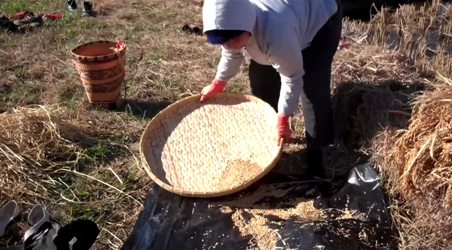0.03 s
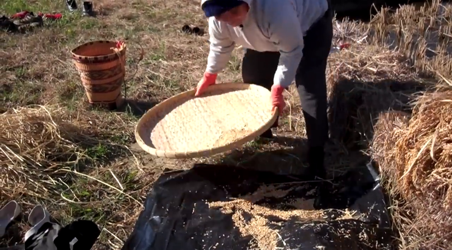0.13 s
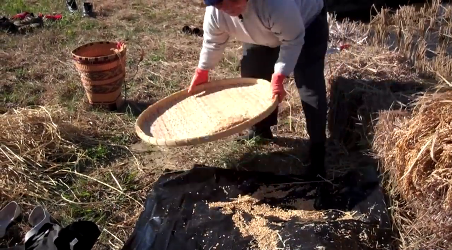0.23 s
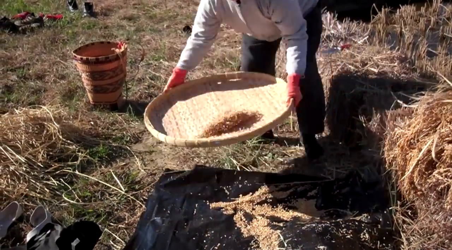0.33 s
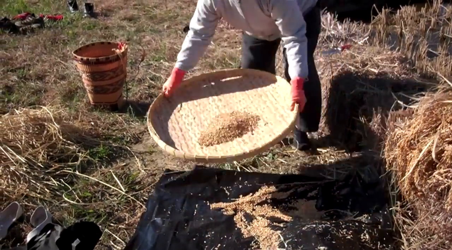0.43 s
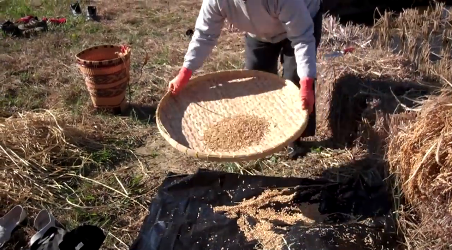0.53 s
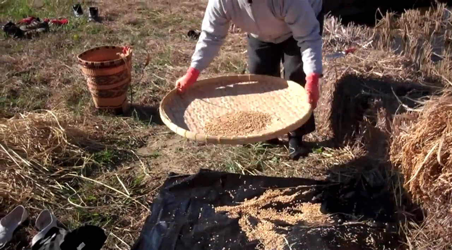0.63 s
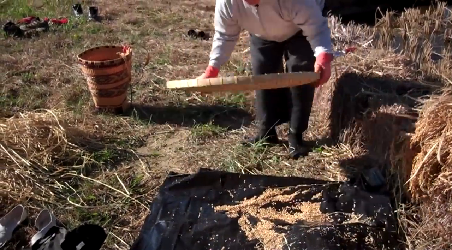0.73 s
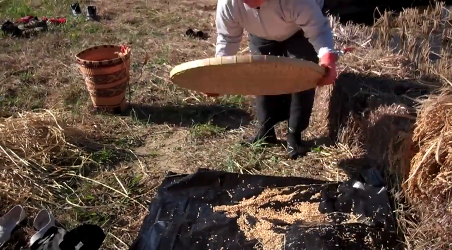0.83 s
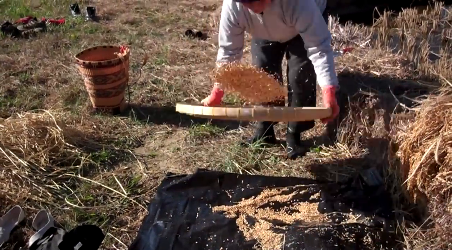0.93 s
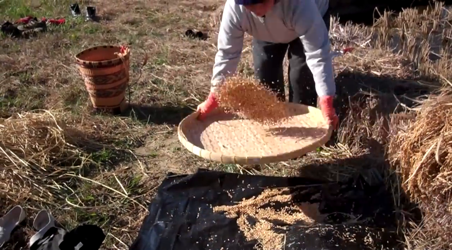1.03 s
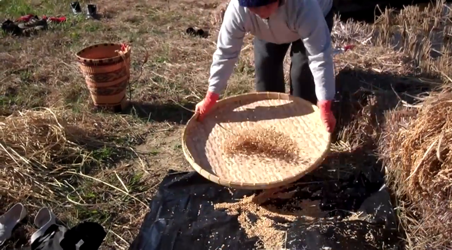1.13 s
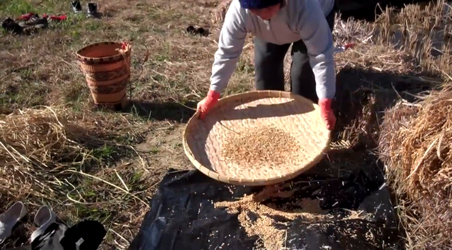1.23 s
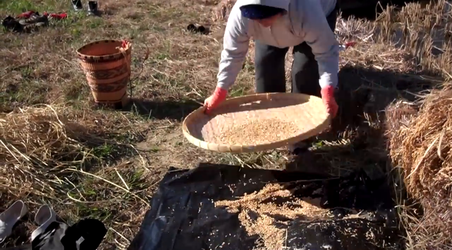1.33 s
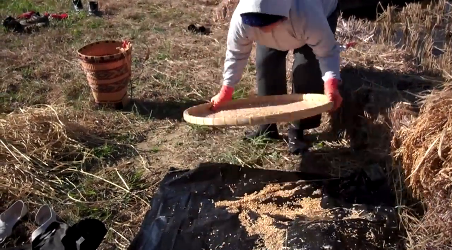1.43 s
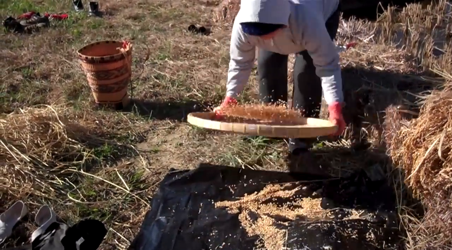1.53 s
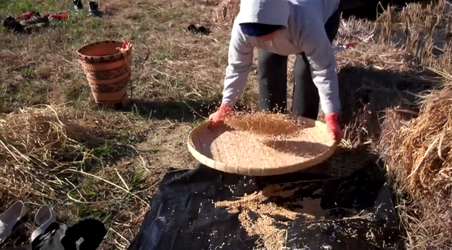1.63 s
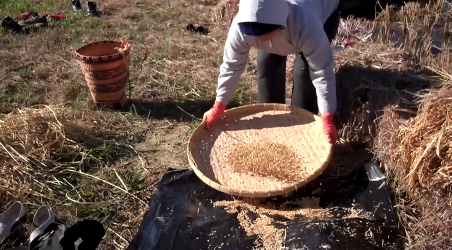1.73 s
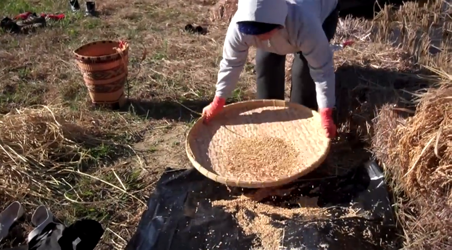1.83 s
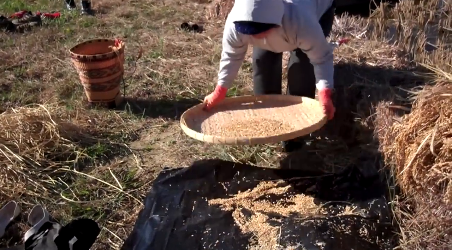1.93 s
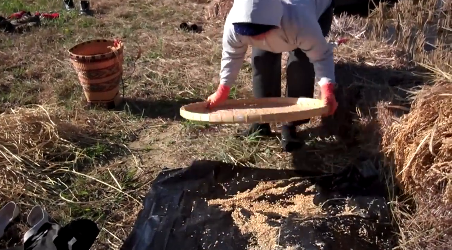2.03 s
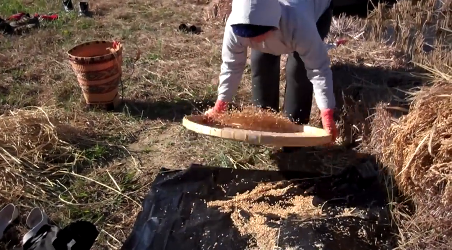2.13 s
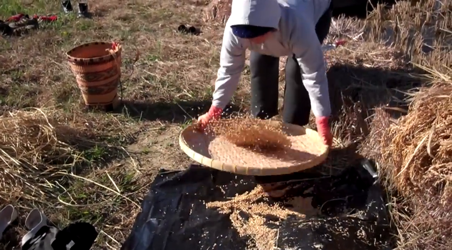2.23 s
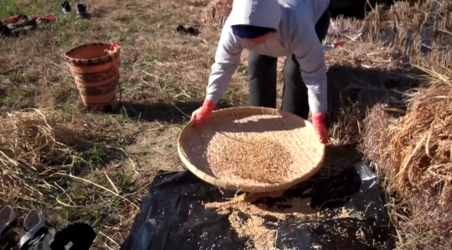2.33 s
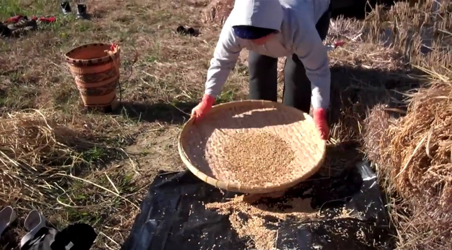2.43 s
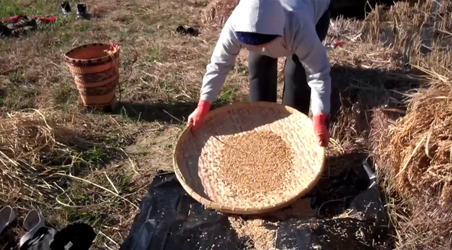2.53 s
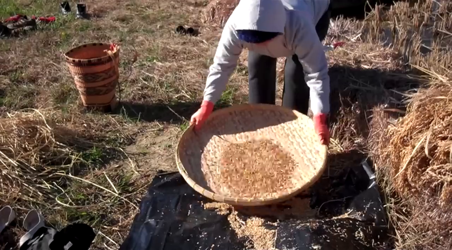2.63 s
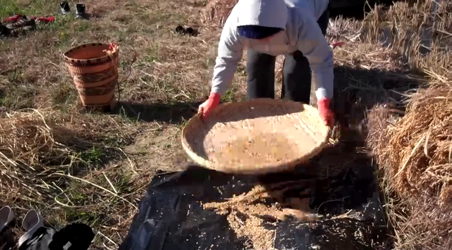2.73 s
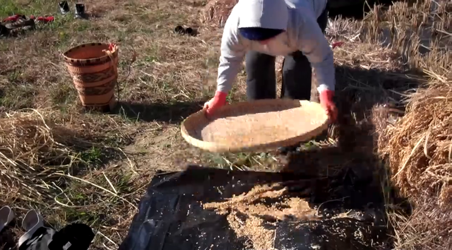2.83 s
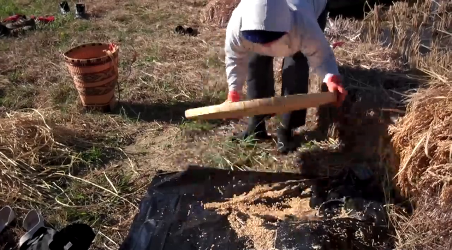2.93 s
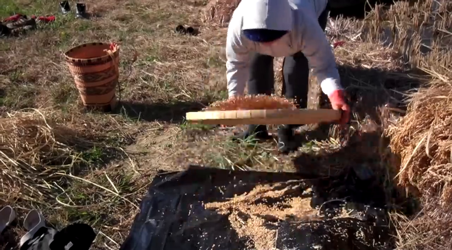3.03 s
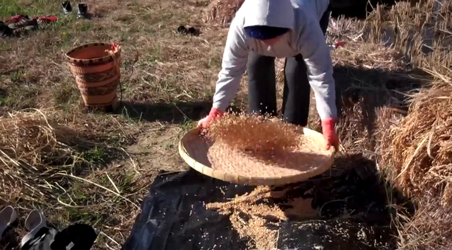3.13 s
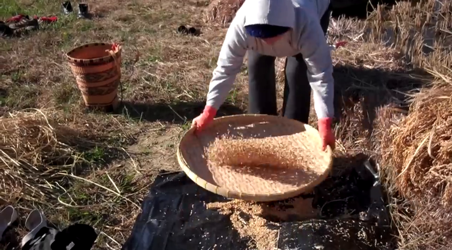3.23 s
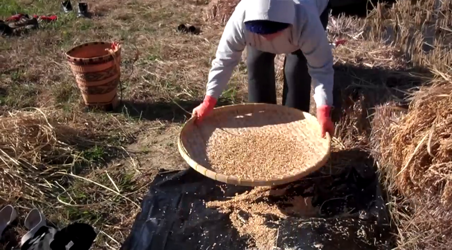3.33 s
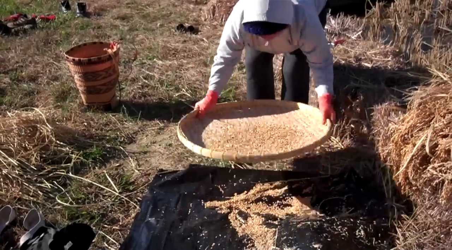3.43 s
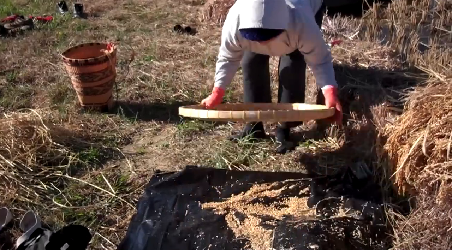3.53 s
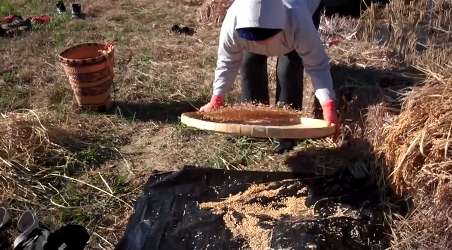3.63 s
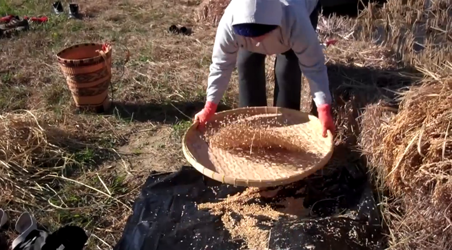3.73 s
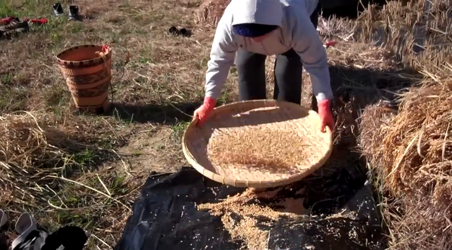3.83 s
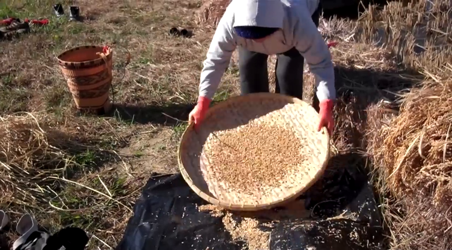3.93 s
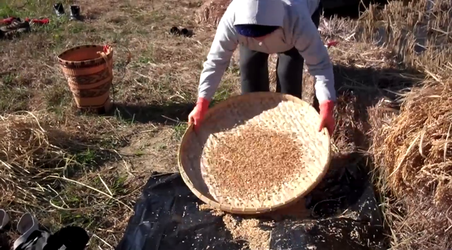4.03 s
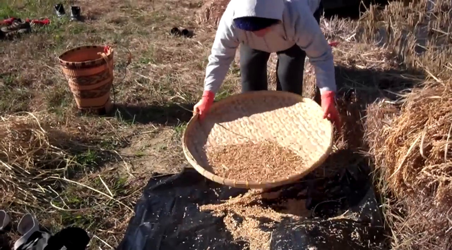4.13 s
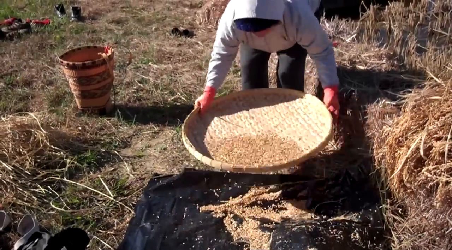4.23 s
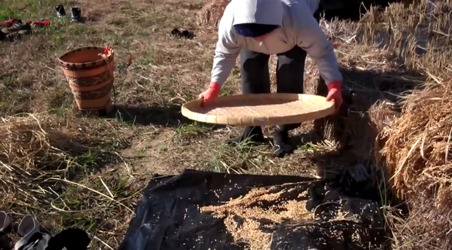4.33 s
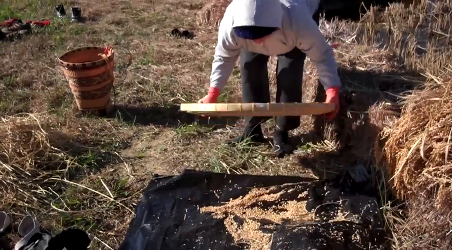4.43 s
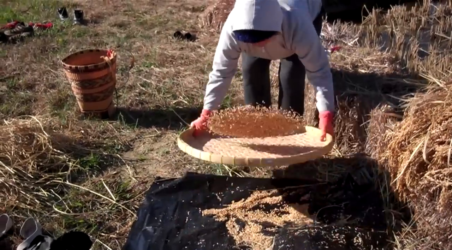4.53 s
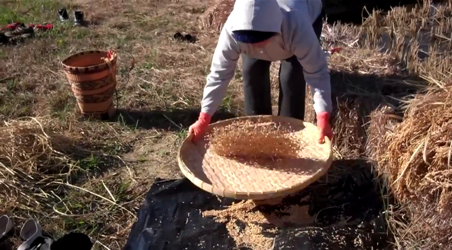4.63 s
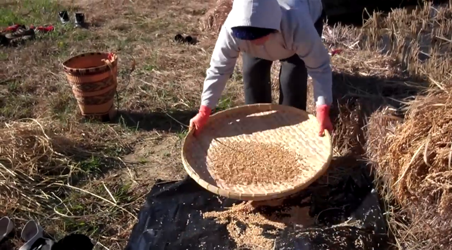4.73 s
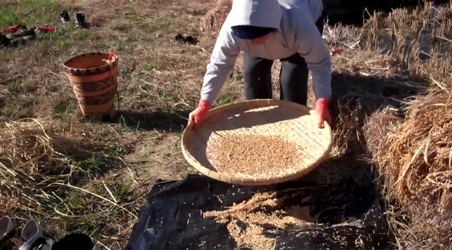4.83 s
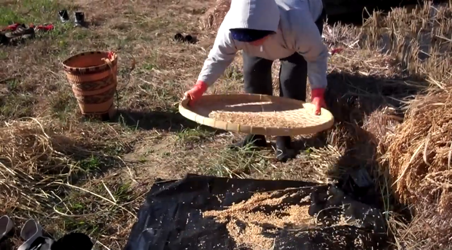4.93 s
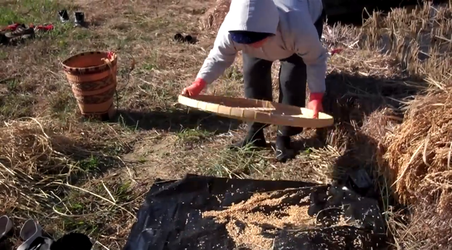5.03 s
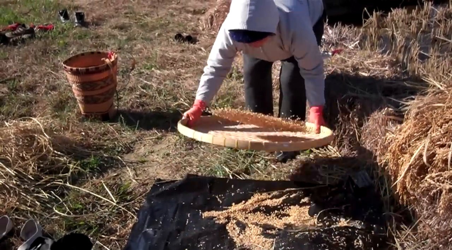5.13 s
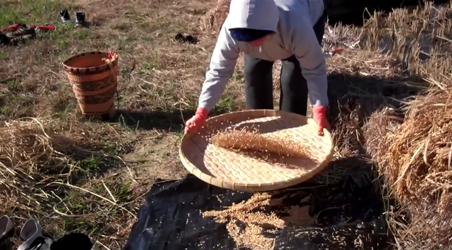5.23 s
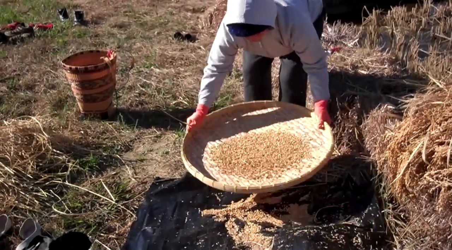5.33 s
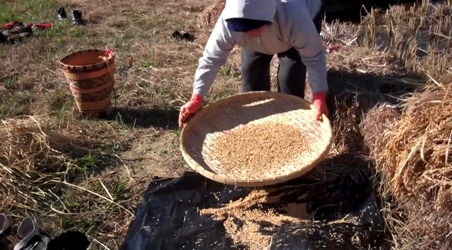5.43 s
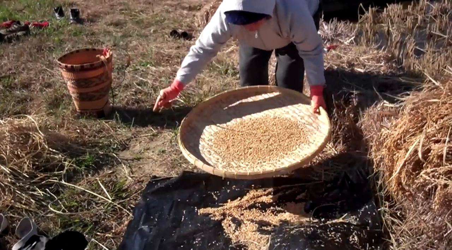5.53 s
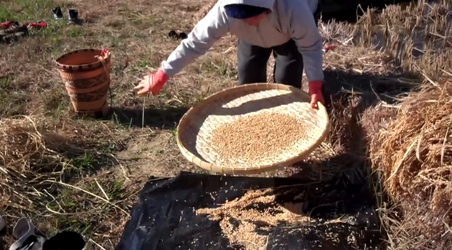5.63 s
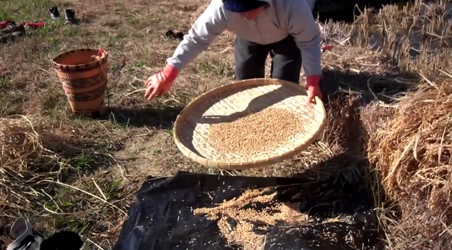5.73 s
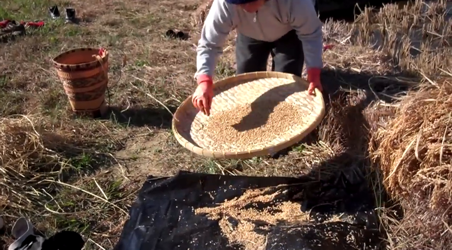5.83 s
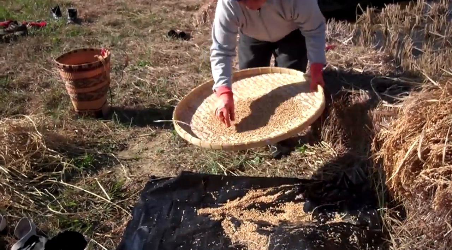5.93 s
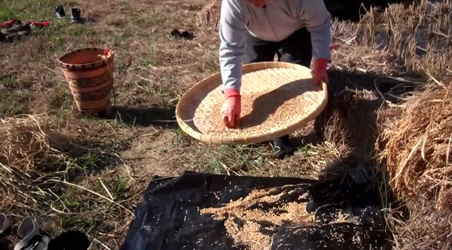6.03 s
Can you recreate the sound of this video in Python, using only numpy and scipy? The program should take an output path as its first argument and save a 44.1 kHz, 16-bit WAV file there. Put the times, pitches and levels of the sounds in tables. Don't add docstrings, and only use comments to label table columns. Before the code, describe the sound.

Rhythmic bright swishes of dry kernels catching on a shallow basket, short rolling tails, faint wind puffs and dry stalk crackle in a field.

```python
import sys
import numpy as np
from scipy import signal
from scipy.fft import rfft, irfft, next_fast_len
from scipy.io import wavfile
from scipy.ndimage import uniform_filter1d

SR = 44100
rng = np.random.default_rng(int(sys.argv[2]) if len(sys.argv) > 2 else 0)


def wav_out(sig):
    wavfile.write(sys.argv[1], SR, np.round(np.clip(np.atleast_2d(sig).T, -1, 1) * 32767).astype(np.int16))


def magnitude_from_level(level_db):
    exponent = np.asarray(level_db, float) / 20
    return 10 ** exponent


N = 268701

# frequency in Hz, level in dB per Hz.
KERNEL_SPECTRUM = [(250, -23.5), (430, -23), (560, -11), (1000, -3), (1500, -3), (2000, 1.5), (2600, 3),
                   (3200, 7), (4500, 6.5), (14000, -5)]


def evened(x):
    return x / np.sqrt(np.mean(x ** 2) + 1e-20)


def read(points, hz):
    f_hz, value = np.transpose(points)
    return np.interp(np.log(hz + 1), np.log(f_hz + 1), value)


def coloured(x, points):
    log_gain = np.log(magnitude_from_level(read(points, abs(np.fft.fftfreq(4096, 1 / SR)))))
    taps = np.fft.ifft(np.exp(np.conj(signal.hilbert(log_gain)))).real[:1024]
    return signal.oaconvolve(x, taps[None], axes=-1)[:, :N]


def filtered(x, order, hz, kind="low"):
    return signal.sosfilt(signal.butter(order, hz, kind, fs=SR, output="sos"), x)


def band(x, lo_hz, hi_hz):
    return filtered(x, 2, [lo_hz, hi_hz], "band")


def wander(hz):
    return evened(filtered(rng.standard_normal(N), 1, hz))


def clicks(per_s, spread_db):
    chance = np.clip(per_s / SR, 1e-4, 1)
    size = magnitude_from_level(spread_db * np.minimum(rng.exponential(1, N), 4))
    size = size * (rng.random(N) < chance) / np.sqrt(chance)
    return evened(size) * rng.choice([-1., 1.], (2, N))


def patchy(x, patchy_db):
    z = signal.stft(x, nperseg=512, noverlap=384)[2]
    patches = uniform_filter1d(rng.standard_normal(z.shape[1:]), size=5, axis=0)
    patches = uniform_filter1d(patches, size=10, axis=1)
    z = z * magnitude_from_level(patchy_db * evened(patches))
    return signal.istft(z, nperseg=512, noverlap=384)[1][:, :N]


def pair(x, same, lead):
    size = next_fast_len(N)
    hz = np.fft.rfftfreq(size, 1 / SR)
    share = read(same, hz)
    a, b = rfft(x, size)
    shared = share * a * np.exp(1j * read(lead, hz))
    right = irfft(shared + np.sqrt(1 - share ** 2) * b, size)[:N]
    return np.array([x[0], right])


def motion():
    # start in seconds, hold in seconds, peak in dB,
    # release in dB per second, first swell in seconds.
    shower_rows = [
        (1.14, 0.18, -14.5, 199, 0.012),
        (1.735, 0.19, -15.5, 277, 0.021),
        (2.3, 0.16, -14.5, 111, 0.016),
        (3.23, 0.18, -14.5, 505, 0.013),
        (3.78, 0.17, -14.5, 124, 0.024),
        (4.676, 0.17, -14.5, 428, 0.017),
        (5.251, 0.17, -15, 231, 0.017),
    ]
    # start in seconds, length in seconds, level in dB,
    # fading in dB per second.
    roll_rows = [
        (1.337, 0.13, -26, 37),
        (1.919, 0.17, -23, 84),
        (3.42, 0.21, -28, 85),
        (3.982, 0.13, -23.5, 61),
        (4.857, .065, -29.5, 14),
        (5.44, 0.1, -29, 19),
    ]
    # peak in seconds, peak in dB,
    # swelling in dB per second, fading in dB per second, tray body in dB.
    slide_rows = [
        (0.0, -32.5, 205, 300, 4.5),
        (.375, -39, 90, 150, 5),
        (0.459, -21.5, 176, 84, 0),
        (0.587, -26, 54, 97, 2),
        (2.573, -23, 123, 70, 4.5),
        (2.751, -16, 130, 127, 4.5),
        (4.193, -15, 137, 124.5, 4),
        (4.92, -31, 300, 166, 2.5),
        (5.56, -32, 300, 82.5, 2),
    ]
    # start in seconds, end in seconds.
    leave_rows = [
        (.66, 0.728),
        (2.9, 2.98),
    ]
    rest_db, shower_body_db, roll_body_db = -47.5, 3.5, 4
    rise_db, arch_db = 14.5, 3
    lift_db_per_s = 400
    round_db = 3
    t = np.arange(N) / SR
    levels, bodies = [rest_db + 0 * t], [roll_body_db]
    for s, hold, db, release, swell in shower_rows:
        arch = arch_db * np.clip(2 * (t - s) / hold - 1, -1, 1) ** 2
        rise = rise_db * np.maximum(1 - (t - s) / swell, 0)
        levels.append(db - arch - rise - release * np.maximum(t - s - hold, 0))
        bodies.append(shower_body_db)
    for s, length, db, fading in roll_rows:
        lift = lift_db_per_s * np.maximum(t - s - length, 0)
        levels.append(np.where(t < s, -99, db - fading * (t - s) - lift))
        bodies.append(roll_body_db)
    for s, db, swelling, fading, body_db in slide_rows:
        fall = np.maximum(swelling * (s - t), fading * (t - s))
        levels.append(db + round_db - np.hypot(round_db, fall))
        bodies.append(body_db)
    flow_db = np.max(levels, axis=0)
    for s, end in leave_rows:
        left = np.clip((end - t) / (end - s), 0, 1) + (t > end + .2)
        flow_db = rest_db + (flow_db - rest_db) * left
    body_db = np.array(bodies)[np.argmax(levels, axis=0)]
    return flow_db, uniform_filter1d(body_db, size=1000)


def grain():
    # frequency in Hz, share 0-1.
    tray_same = [(300, .99), (1500, .98), (2400, .78), (3700, .92), (4700, .75), (6700, .92), (8500, .66),
                 (11000, .3), (14000, .25)]
    # frequency in Hz, phase in radians.
    tray_lead = [(1500, 0), (2300, .5), (3600, 0), (4800, .7), (5800, .65), (7200, -.25), (8000, .5),
                 (10000, 1.4), (14000, 2.6)]
    husk_db, husk_db_per_db, husk_least_db = 2.5, 0.02, -7
    flow_db, body_db = motion()
    bright_db = np.maximum(husk_db + husk_db_per_db * (flow_db - flow_db.max()), husk_least_db)
    flow_db = flow_db - 4 * np.maximum(-47.0 - flow_db, 0)
    per_s = 24000 * magnitude_from_level(.4 * (flow_db - flow_db.max()))
    hits = clicks(per_s, 2.83) * magnitude_from_level(0.35 * wander(200) + 0.29 * wander(24))
    strike = evened(patchy(coloured(hits, KERNEL_SPECTRUM), patchy_db=1.5))
    low = filtered(strike, 2, 2300)
    high = filtered(strike, 2, 5000, "high")
    strike = strike + high * (magnitude_from_level(bright_db) - 1) + low * (magnitude_from_level(body_db) - 1)
    return pair(strike * magnitude_from_level(flow_db - 2.0) + strays(), tray_same, tray_lead)


def straw():
    # time in seconds, level in dB.
    straw_rows = [(0.0, -46.5), (0.2, -47), (0.74, -55.5), (0.94, -52), (1.07, -54.5), (1.51, -43.5),
                  (1.6, -46), (2.17, -52), (2.27, -48.5), (2.93, -46), (2.99, -48.5), (3.65, -46.5),
                  (4.36, -45), (4.58, -51), (5.1, -50.5), (5.67, -47.5), (5.8, -42), (6.05, -47.5)]
    # frequency in Hz, level in dB per Hz.
    rustle_spectrum = [(100, -7.5), (400, -9.5), (700, -4), (1300, -9), (2500, -1), (3500, 5), (5200, 6.5),
                       (6200, 1.5), (14000, 2.5)]
    # frequency in Hz, share 0-1.
    straw_same = [(200, .3), (700, .8), (1400, .5), (2800, .5), (3300, .8), (4600, .85), (5200, .5),
                  (6500, .7), (8500, .62), (12000, .3)]
    # frequency in Hz, phase in radians.
    straw_lead = [(500, 0), (1600, 1.8), (2400, 1.5), (3300, 2.8), (4600, 3.4), (5200, 4.2), (6200, 3.7),
                  (7500, 4.4), (9000, 6.5), (12000, 9.2), (14000, 11.7)]
    level_db = np.interp(np.arange(N) / SR, *np.transpose(straw_rows))
    snaps = clicks(20000, 1.9) * magnitude_from_level(1.0 * wander(12.0))
    crackle = patchy(coloured(snaps, rustle_spectrum), patchy_db=2.4)
    return pair(evened(crackle) * magnitude_from_level(level_db + 12.5), straw_same, straw_lead)


def breeze():
    # peak in seconds, level in dB, moan in Hz, half length in seconds.
    gust_rows = [(.08, -53, 140.8, 0.15), (.25, -42, 220, 0.033), (.32, -55, 163.5, .05),
                 (.42, -51, 146.3, .055), (.68, -48, 124.8, 0.051), (.78, -49.5, 84.7, 0.091),
                 (.885, -42.5, 212, 0.055), (.92, -54, 280, 0.21), (1.31, -49.5, 105.2, 0.1),
                 (1.58, -53.5, 99.9, 0.077), (1.66, -46.5, 125.4, .05), (1.85, -52.5, 142, 0.085),
                 (2.03, -46.5, 165, 0.11), (2.14, -50.5, 226.6, 0.08), (2.2, -44.5, 203, 0.062),
                 (2.29, -42, 144, 0.044), (2.39, -52.5, 135, .05), (2.65, -51, 85.1, .1),
                 (2.8, -45, 120, .05), (2.85, -45.5, 126.5, 0.068), (2.95, -41, 156.2, 0.045),
                 (3.08, -49, 142.5, 0.036), (3.23, -50.5, 151, 0.12), (3.31, -49, 147, 0.072),
                 (3.56, -62, 120, .1), (3.79, -51.5, 89.6, .06), (3.96, -48, 94.8, 0.057),
                 (4.24, -52, 99.6, 0.052), (4.31, -51, 99.8, 0.11), (4.44, -49.5, 90, .09)]
    gust_edge_db, calm_db = 15.5, -60.5
    calm_dip_db = 10
    pan_db_per_db, pan_from_db = -0.88, -62.5
    t = np.arange(N) / SR
    catching = uniform_filter1d(np.clip((motion()[0] + 30) / 15, 0, 1), size=4000)
    levels = [calm_db - calm_dip_db * catching]
    for s, db, _, half_s in gust_rows:
        levels.append(db - gust_edge_db * abs(t - s) / half_s)
    gust_db = np.max(levels, axis=0)
    moan_hz = np.interp(t, *np.transpose(gust_rows)[[0, 2]])
    return gust_db, moan_hz, np.minimum(pan_db_per_db * (gust_db - pan_from_db), 0)


def wind():
    gust_db, moan_hz, pan_db = breeze()
    rumble = band(band(rng.standard_normal((2, N)), 38, 163), 41, 380)
    rumble = rumble * magnitude_from_level([2.0 * wander(13.0), 1.2 * wander(15)])
    fuzz = filtered(rng.standard_normal(N) + 1j * rng.standard_normal(N), 2, 13)
    fuzz = 1.8 + fuzz / np.std(fuzz)
    moan = evened((fuzz * np.exp(2j * np.pi * np.cumsum(moan_hz) / SR)).real)
    strong = np.clip((gust_db + 59.0) / 12, 0, 1)
    left = evened(rumble[0]) * magnitude_from_level(pan_db)
    right = evened(rumble[1]) * np.sqrt(1 - 0.49 * strong) + moan * np.sqrt(1.6 * strong)
    return np.array([left, right]) * magnitude_from_level(gust_db + 5.5) / np.sqrt(1 + magnitude_from_level(2 * pan_db))


def field():
    murmur = evened(band(rng.standard_normal(N), 253, 1530))
    return magnitude_from_level(-61 + 1.2 * wander(3)) * murmur * np.ones((2, 1))


def ticks():
    # start in seconds, peak in dB, ring in Hz, ring t60 in seconds.
    tick_rows = [(0.089, -37, 1890, 0.015), (0.147, -43, 902, 0.02), (0.7, -26, 830, 0.0096),
                 (0.812, -39, 706, 0.023), (1.02, -39.5, 1676, 0.07), (1.579, -38, 990, 0.016),
                 (2.082, -40, 730, 0.015), (3.641, -37.5, 2020, 0.02), (4.419, -37, 1920, 0.02),
                 (4.625, -39, 1070, 0.025), (5.644, -36, 1070, 0.027), (5.718, -32.5, 2300, 0.016),
                 (5.717, -34.5, 865, 0.044), (5.765, -38, 1050, 0.021), (5.798, -34.5, 1239, 0.02),
                 (5.847, -28, 736, 0.013), (5.86, -23.5, 1730, 0.016), (5.864, -25, 1500, 0.0095),
                 (5.711, -38, 2500, 0.011)]
    out, t = np.zeros(N + 3000), np.arange(3000) / SR
    for s, db, hz, t60_s in tick_rows:
        crack_fade = 1.5 * magnitude_from_level(-60 * t / 0.012) + .3 * magnitude_from_level(-60 * t / .1)
        crack = 1.6 * band(rng.standard_normal(3000), 600, 3100) * crack_fade
        sinking_t = t + 0.00028 * (1 - np.exp(-t / 0.0046))
        ring = 1.1 * np.sin(2 * np.pi * hz * sinking_t) * magnitude_from_level(-60 * t / max(t60_s, .003))
        out[round(s * SR):][:3000] += magnitude_from_level(db - 3.0) * (ring + crack)
    return out[:N] * np.ones((2, 1))


def puffs():
    # start in seconds, peak in dB, frequency in Hz.
    puff_rows = [(0.097, -36, 171), (0.248, -32, 170), (0.308, -33, 171), (0.418, -34, 172),
                 (0.667, -30.5, 170), (1.36, -38, 190), (1.4, -40, 90), (1.445, -34, 100),
                 (1.499, -37, 230), (1.861, -39, 173), (2.209, -27, 174.3), (2.459, -36.5, 165.1),
                 (2.949, -34, 169), (3.069, -38, 171.2), (3.789, -42, 171), (3.959, -51, 167),
                 (4.249, -54, 174), (4.309, -50, 167.6), (4.459, -51, 168)]
    peak_delay_s = .012
    out, t = np.zeros(N + 2000), np.arange(2000) / SR - peak_delay_s
    for s, db, hz in puff_rows:
        push = np.exp(-(t / 0.003) ** 2) * np.sin(2 * np.pi * hz * t)
        out[round(s * SR):][:2000] += magnitude_from_level(db) * push
    return out[:N] * magnitude_from_level([[-22], [0]])


def strays():
    # start in seconds, peak in dB, rattle in seconds.
    stray_rows = [(0.9224, -21, 0.0046), (1.051, -29, 0.004), (1.1075, -22, 0.004), (1.1308, -8, 0.0028),
                  (1.359, -9, 0.0017), (1.467, -17, .002), (1.5019, -17, 0.0048), (2.935, -15.5, 0.0058),
                  (3.209, -9.5, 0.0052), (3.2231, -13, 0.0037), (3.774, -7.5, 0.0034),
                  (4.6316, -22, 0.0031), (4.6407, -8.5, 0.0026), (4.645, -16, 0.0031), (4.664, -17, 0.0033),
                  (4.674, -13, 0.004), (5.2213, -15.5, 0.011), (5.2374, -18, 0.0043), (5.5633, -16, 0.0045),
                  (5.665, -27, 0.0052), (5.85, -21, 0.0049)]
    # start in seconds, peak in dB, rattle in seconds.
    clump_rows = [(1.1442, -7, 0.0032), (1.1738, -14, 0.002), (1.191, 3, 0.0022), (1.2817, 6, 0.0023),
                  (1.746, -10, 0.0023), (2.3027, -5, 0.0025), (2.3914, 4, 0.0017), (3.239, -3, 0.0026),
                  (3.288, -14, 0.002), (3.347, -3, 0.0018), (3.37, 7, 0.0015), (3.7973, -11, 0.002),
                  (3.855, -14, 0.0018), (3.8961, 4, 0.0023), (4.6795, -0.5, 0.0015), (4.696, -10, 0.002),
                  (4.7158, -9, 0.0015), (5.261, -1, 0.0018), (5.2715, -16, 0.0021), (5.28, -18, 0.002),
                  (5.2944, -12, 0.002), (5.318, -13, 0.002), (5.326, -5, 0.002)]
    out, t = np.zeros((2, N + 1000)), np.arange(1000) / SR
    for s, db, rattle_s in [*stray_rows, *clump_rows]:
        rattle = rng.standard_normal((2, 1000)) * np.exp(-t / max(rattle_s, .0006))
        out[:, round(s * SR):][:, :1000] += magnitude_from_level(db - 17) * rattle
    return coloured(out, KERNEL_SPECTRUM)


def scene():
    return grain() + straw() + wind() + field() + ticks() + puffs()


def low_pass(x):
    return signal.sosfilt(signal.butter(12, 15030, fs=SR, output="sos"), x)


def record(dry):
    # frequency in Hz, gain in dB.
    left_port = [(4000, -0.5), (5000, 1), (5700, 2.5), (6800, 5), (7600, 12.5), (8300, 7), (9500, 3.5),
                 (10700, -2.5), (14000, -0.5), (14600, -44)]
    # frequency in Hz, gain in dB.
    right_port = [(4000, 0.5), (5000, 0), (5800, 7.5), (6500, 12), (7400, 5), (8300, -1), (9500, -7),
                  (12000, -19), (14000, -102), (14600, -64)]
    size = next_fast_len(N)
    hz = np.fft.rfftfreq(size, 1 / SR)
    response = magnitude_from_level([read(left_port, hz), read(right_port, hz)])
    ports = irfft(rfft(dry, size) * response, size)[:, :N]
    over = np.maximum(abs(ports) - .7, 0)
    mix = ports - np.sign(ports) * (over - .22 * np.tanh(over / .22))
    return low_pass(mix)


dry = scene()
out = record(dry)
wav_out(out)
```